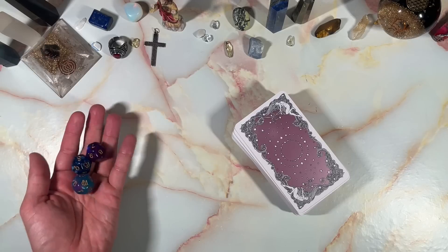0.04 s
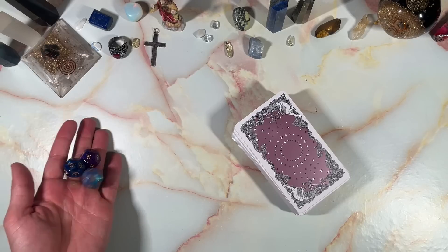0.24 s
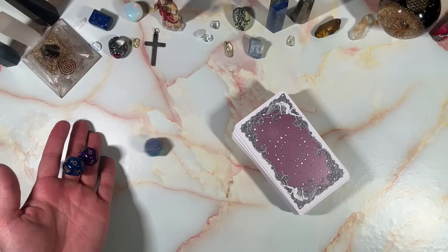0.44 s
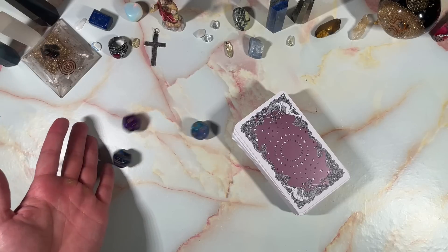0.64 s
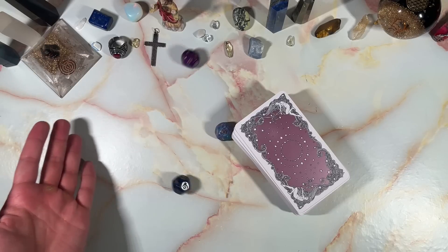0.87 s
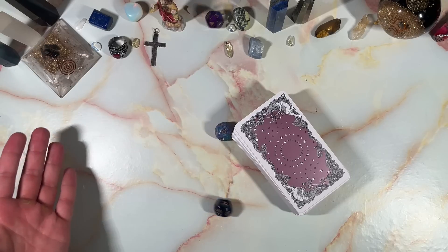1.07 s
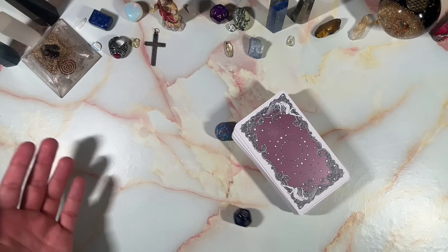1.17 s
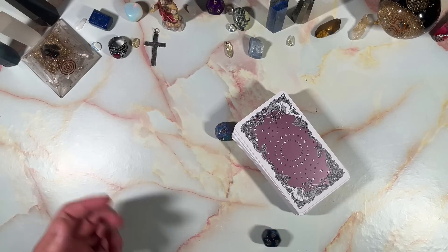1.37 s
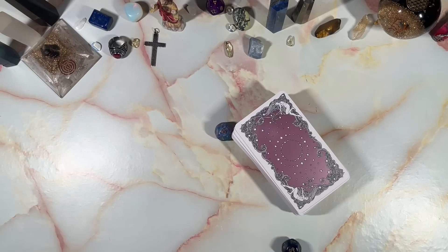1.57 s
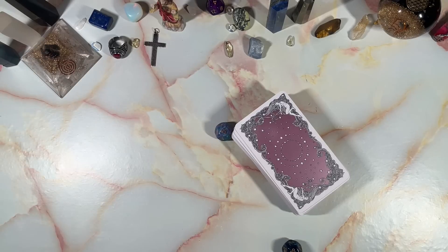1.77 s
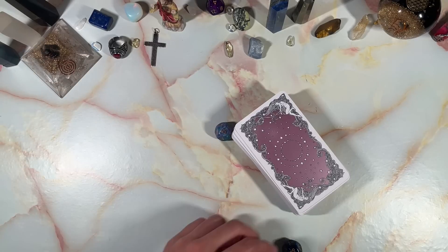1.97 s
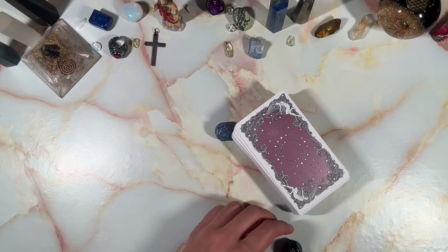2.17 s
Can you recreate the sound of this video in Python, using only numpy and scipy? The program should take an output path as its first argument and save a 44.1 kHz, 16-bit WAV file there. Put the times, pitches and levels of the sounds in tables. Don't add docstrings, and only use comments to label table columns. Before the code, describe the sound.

Dice clatter on a hard stone tabletop. Faint clicks and a slight skin rub come from the palm until 0.35 s, then a sharper click and first rolling knocks. Loud, resonant bounces crowd 0.55-0.95 s, strongest around 0.6-0.8. Softer knocks mix with a thin chain's bright tinkling until 1.15. Duller, sparse far taps fade by 1.7, leaving low room murmur. Close phone stereo, short faint reflections.

```python
import sys
import numpy as np
from scipy import signal
from scipy.fft import rfft, irfft
from scipy.io import wavfile
from scipy.ndimage import uniform_filter1d

SR = 44100
rng = np.random.default_rng(int(sys.argv[2]) if len(sys.argv) > 2 else 0)


def boost(x):
    u = np.asarray(x, float) / 20
    return 10 ** u


def to_wav(s):
    ch = np.atleast_2d(s).T
    pcm = np.round(np.clip(ch, -1, 1) * 32767)
    wavfile.write(sys.argv[1], SR, pcm.astype(np.int16))


N = 97902

# pitch_hz, level_db
FAR_COLOUR = [(200, 0), (500, 5), (1100, -6), (1500, -1.5), (2050, 7), (2800, -12.5), (3450, -1.5),
              (4400, -17)]
FAR_FROM_S = 1.2
GRAIN_DB = 1.5
KNOCK_DB = 1.5


def read(table, hz):
    a = np.array(table)
    return np.interp(np.log(hz), np.log(a[:, 0]), a[:, 1])


def curve(table):
    a = np.array(table)
    return boost(np.interp(np.arange(N) / SR, a[:, 0], a[:, 1], left=-140, right=-140))


def unit(x):
    return x / np.sqrt(np.mean(x ** 2))


def colour(x, table):
    f = np.maximum(np.fft.rfftfreq(N, 1 / SR), 1)
    inside = (f > table[0][0]) & (f < table[-1][0])
    return irfft(rfft(x) * boost(read(table, f)) * inside, N)


def low(x, hz):
    return signal.sosfilt(signal.butter(8, hz, fs=SR, output="sos"), x)


def band(x, low_hz, high_hz):
    return signal.sosfilt(signal.butter(2, [low_hz, high_hz], "band", fs=SR, output="sos"), x)


def grit(size, spread_db):
    bursts_db = spread_db * np.minimum(rng.exponential(size=size), 4.5)
    return unit(rng.standard_normal(size) * boost(bursts_db))


def decay(x, t60):
    return signal.lfilter([1], [1, -np.exp(-np.log(1000) / t60 / SR)], x)


def ring(x, hz, t60):
    return signal.lfilter([1], [1, -np.exp((2j * np.pi * hz - np.log(1000) / t60) / SR)], x)


def contact(s, chatter_ms, rise_s, knock_db):
    chatter_db = -4.5
    t = np.arange(4000) / SR
    swell = (1 - np.exp(-t / rise_s)) * np.exp(-1000 * t / max(chatter_ms, .3))
    force = boost(chatter_db) * grit(len(t), GRAIN_DB) * swell / np.sqrt(1 + chatter_ms) / 2
    force[int(rise_s * SR)] += boost(knock_db) / np.sqrt(1 + chatter_ms / 4)
    at = max(int(s * SR), 0)
    return slice(at, at + len(t)), force


def ports(hz, luck):
    # pitch_hz, level_db
    left_over_right = [(100, -2.5), (250, -0.5), (500, -9), (1000, -3), (2000, 1), (4000, -2.2)]
    # pitch_hz, phase_rad
    phase_spread = [(100, .2), (250, 0.28), (500, 1.3), (1000, 0.28), (2000, 1.4), (4000, .9)]
    lag_s = -0.000063
    half = np.pi * hz * lag_s + read(phase_spread, hz) * luck / 2
    left_db = read(left_over_right, hz)
    left = boost(left_db / 2) * np.exp(-1j * half)
    right = boost(-left_db / 2) * np.exp(1j * half)
    return np.array([[left], [right]])


def hiss(shape, tilt_db):
    # pitch_hz, level_db
    treble = [(5300, -33), (5800, -1), (8000, 1), (9600, -8.5), (10300, -16.5), (11500, -7), (13500, -15),
              (15800, -19.5)]
    mid, side = rng.standard_normal((2, N))
    noise = np.array([mid + .3 * side, np.roll(mid - .3 * side, 1)])
    tone = [(hz, db + tilt_db * np.log2(hz / 8000)) for hz, db in treble]
    return colour(noise * shape, tone) / np.std(colour(noise, tone))


def air():
    # pitch_hz, level_db (per Hz)
    murmur = [(40, -20.5), (90, -14.5), (150, -8.5), (450, -2.5), (800, -14), (2300, -26.5), (3000, -43),
              (6000, -43.5)]
    # pitch_hz, width_hz, level_db
    resonances = [(168, 16, 0), (474.6, 18, 2)]
    # start_s, level_db
    swell = [(0, 6.5), (1.1, 11), (1.5, 8.5), (1.75, 1.5), (2.3, 2.9)]
    level_db, hum_db = -67, -5.5
    likeness = 0.56
    mid, side = rng.standard_normal((2, N))
    mid, side = np.sqrt(1 + likeness) * mid, np.sqrt(1 - likeness) * side
    noise = np.array([mid + side, mid - side])
    hum = sum(boost(db) * unit(ring(noise, hz, 2.2 / width).imag) for hz, width, db in resonances)
    sway = boost(0.6 * unit(uniform_filter1d(rng.standard_normal(N), size=5000)))
    tone = unit(unit(colour(noise, murmur)) + boost(hum_db) * unit(hum))
    return tone * boost(level_db) * sway * curve(swell)


def reflections(near):
    t60_s, start_s, level_db = .22, 0.007, -19
    t = np.arange(SR // 2) / SR
    fade = np.exp(-np.log(1000) * t / t60_s) * np.clip(t / start_s - 1, 0, 1)
    tail = rng.standard_normal((2, len(t))) * fade
    tail = signal.sosfilt(signal.butter(1, 1809, fs=SR, output="sos"), tail)
    tail = tail / np.sqrt(np.sum(tail ** 2) / 2)
    return boost(level_db) * signal.fftconvolve(near.mean(0)[None], tail, axes=1)[:, :N]


def skin_slide():
    # start_s, level_db
    slide = [(.252, -50), (.268, -60.5), (.285, -52), (.31, -52.5), (.345, -62.5), (.368, -72.5)]
    skin = [(1500, -29), (2100, -10.5), (2900, -21), (4600, 1.0), (5600, -9), (6500, -12), (7500, -15),
            (9200, -37)]
    return unit(colour(grit(N, 3.5), skin)) * curve(slide) * np.ones((2, 1))


def pitched_clicks():
    # start_s, level_db, pitch_hz, chatter_ms, rise_ms; from 0.366 s these are the first knocks of a die
    clicks = [(.002, -45.5, 4200, 2, .9), (0.0098, -40, 3980, 7.4, 0.8), (0.146, -38, 4700, 7.2, .8),
              (0.155, -36.5, 4000, 9.5, 1.6), (0.179, -53, 3800, 4, 0.76), (0.2503, -35, 4840, 0.57, 0.56),
              (0.276, -31.5, 4550, 15, 3.7), (0.366, -23, 3900, 3.5, 5.5), (0.369, -12.5, 2500, 3, 5.5),
              (0.462, -22.5, 2300, 3.6, 2), (0.463, -31.5, 4060, 4.1, 2)]
    partials = [(.47, -10, 0.009), (.8, -3, 0.0036), (.9, 5.5, .007), (1, 8, 0.0083), (1.12, 4.5, 0.0051),
                (1.24, -1.5, 0.0036), (1.6, -9, 0.0047)]
    palm_db = 7
    out = np.zeros((2, N))
    for s, db, hz, chatter_ms, rise_ms in clicks:
        at, push = contact(s, chatter_ms, rise_ms / 1000, KNOCK_DB - 2 * rise_ms)
        force = np.zeros(N)
        force[at] = push * boost(db + palm_db - 8)
        for ratio, part_db, t60 in partials:
            f = hz * ratio
            tone = (ports(f, rng.standard_normal()) * ring(force, f, t60)).imag
            out += boost(part_db) * band(tone, f / 1.09, f * 1.3)
    return out


def chain():
    # start_s, level_db
    rattle = [(.958, -60), (.98, -51.5), (1.008, -51.5), (1.013, -64.5), (1.029, -68.5), (1.036, -56.5),
              (1.10, -47), (1.128, -73.5)]
    # start_s, level_db, length_ms
    link_ticks = [(0.965, -44.5, 2.8), (0.977, -37.5, 4), (1.001, -30, 3.8), (1.031, -25.5, 4.4),
                  (1.042, -44.5, 2.3), (1.059, -40.5, 2.6), (1.067, -33.5, 3), (1.074, -42, 4.6),
                  (1.086, -45, 5.3), (1.137, -43, 7.4)]
    rattle_db, tilt_db = 3.5, 11
    ticks = uniform_filter1d(np.abs(grit(N, 4.74)), size=40) * curve(rattle) * boost(rattle_db)
    for s, db, ms in link_ticks:
        age = np.maximum(np.arange(N) / SR - s, 0) * 1000 / ms
        ticks = ticks + boost(db + 11.0) * age * np.exp(-2 * age)
    body = band(rng.standard_normal(N) * ticks, 2600, 5500)
    return hiss(ticks, tilt_db) + boost(5.0) * body


def slab_modes():
    # pitch_hz, level_db (over the dense modes),
    # t60_s
    standout = [(160, 2, 0.063), (241.7, 11, 0.13), (296.1, 7.5, 0.13), (312, 10.5, 0.13), (409, 1, .1),
                (457, 6, 0.14), (554.6, 7.5, 0.1), (711.4, 6, 0.078), (885.7, 6.5, 0.088), (958.6, -3, .08),
                (1175, -0.5, 0.042), (1276.6, 3.5, 0.027), (1372, -4.5, 0.02), (3400, 3, 0.064)]
    # pitch_hz, level_db
    top = [(90, -31.5), (290, -13), (600, -13), (1250, -2.5), (2100, 0), (3400, -6), (4600, -10),
           (5500, -13.5)]
    # pitch_hz, t60_s
    ring_t60 = [(100, 0.083), (400, 0.1), (1000, 0.032), (2800, 0.039), (5500, 0.03)]
    count = 72
    place = np.arange(count) + .5 + .3 * rng.standard_normal(count)
    dense_hz = 80 + 5500 * (place / count) ** 1.6
    low_hz, low_db, low_t60 = np.array(standout).T
    hz = np.r_[dense_hz, low_hz]
    t60 = np.r_[read(ring_t60, dense_hz), low_t60]
    lift_db = np.r_[0 * dense_hz, low_db]
    gain = boost(read(top, hz) + lift_db - 20.0) * (hz / 1500) ** 0.26
    return hz, t60, gain, rng.standard_normal(len(hz))


def knocks(hz):
    # start_s, level_db, tilt_db (per octave), treble_db,
    # chatter_ms
    bounces = [(.146, -59, -10.5, -60, 6.7), (.379, -23.5, 5, -37, 8), (.3885, -18, 1.5, -38, 15),
               (.404, -21, -0.5, -41.5, 8), (.420, -19.5, -3, -41, 2), (.4685, -13.5, 1, -37.5, 9),
               (.4745, -17.5, -1.5, -41, 12), (.487, -17.5, 1.5, -43, 8), (.495, -15.5, 3, -40, 5),
               (.511, -23, -5, -41, 6), (.538, -13, 1.8, -37.5, 8), (.546, -13, 0, -40.5, 8),
               (.555, -15.5, 2.5, -39, 10), (.586, -0.5, 2.06, -33.5, 2.26), (.598, -9.5, 5.5, -34.5, 5),
               (.607, -12, 4.5, -36, 5), (.613, -10.5, -2.5, -28.5, 6), (.620, -17.5, 3.5, -26.5, 4),
               (.638, -8.5, -0.5, -38.5, 2.7), (.652, -5.5, -0.7, -27.5, 5.8), (.6635, -4.5, 4.5, -34, 1.8),
               (.6665, -6.5, 7.5, -34, 2.5), (.675, -11, -4, -34.5, 4), (.714, -7, 6.5, -31, 3.1),
               (.7217, -1.2, 0.3, -38, 2.4), (.7247, -2.65, -0.7, -40, 2.1), (.733, -17.5, -1.5, -38.5, 5),
               (.7735, 0.5, 0.5, -28.5, 2.34), (.7802, -2.5, 0, -32, 8.6), (.811, -11, 6.5, -39.5, 1.7),
               (.819, -9.5, 0.5, -23.5, 1.1), (.8275, -3, -2, -22.5, 1.5), (.836, -12.5, -3, -40, 3),
               (.851, -9.5, 1, -40.5, 2), (.857, -17, -6, -45, 2), (.881, -9.5, 4.5, -29.5, 2.8),
               (.894, -8.5, -2.7, -36.5, 4.1), (.9275, -10.5, 0.1, -39.5, 3)]
    # start_s, level_db, tilt_db (per octave), treble_db, chatter_ms
    settling = [(.962, -19, -1, -41, 26), (.991, -13, -0.2, -25, 1.6), (1.014, -13, -1.5, -26, 1.2),
                (1.037, -18.5, -1.3, -23, 6.2), (1.055, -20, 1.3, -32, 0.83), (1.065, -23, -2.3, -15, 2.4),
                (1.074, -21, 3, -29, 9.3), (1.139, -32.5, 5, -24, 15), (1.154, -22.5, 1.2, -40, 3.8),
                (1.272, -34, -7.5, -50, 5.8), (1.298, -17, 2.8, -48, 7.4), (1.355, -19.5, 5.7, -40, 2.1),
                (1.386, -30.5, 2, -50, 2.6), (1.392, -35.5, -4.5, -50, 5.6), (1.415, -38, -3, -55, 5),
                (1.430, -43, -2, -55, 4.7), (1.4405, -39, 0.3, -57, 3.8), (1.459, -39.5, -6.5, -56, 4.2),
                (1.491, -48, -6, -55, 3.2), (1.588, -45, -7.5, -51, 10.4), (1.596, -49.5, 0, -56, 3.5),
                (1.642, -49, -4, -55.5, 9.5), (1.665, -35, 2.3, -55, 4.05), (1.682, -48, -5, -57, 4)]
    table_db, treble_gain_db, scatter_db = 3.5, 2, 2.5
    bell_hz, bell_db = 1866, 0.42
    in_step = .65
    count = len(hz)
    force, crack = np.zeros((count, N)), np.zeros(N)
    octave = np.log2(hz / bell_hz)
    for s, db, tilt_db, treble_db, chatter_ms in list(bounces) + list(settling):
        if s > FAR_FROM_S:
            at, push = contact(s, chatter_ms, 0.0034, -6)
            tone_db = tilt_db * np.maximum(octave, -1) + read(FAR_COLOUR, hz)
        else:
            at, push = contact(s, chatter_ms, 0.00091, KNOCK_DB)
            tone_db = tilt_db * octave
        scatter = scatter_db * np.clip(rng.standard_normal(count), -2, 1.5)
        mix = boost(db + table_db + tone_db - bell_db * octave ** 2 + scatter)
        sign = np.where(rng.random((count, 1)) < in_step, 1, -1)
        force[:, at] += mix[:, None] * sign * push
        crack[at] += boost(db + treble_db + treble_gain_db) * np.abs(push)
    return force, crack


def tabletop():
    # start_s, level_db
    roll_levels = [(.375, -48), (.40, -22.5), (.455, -31.5), (.578, -28.5), (.63, -20.5), (.70, -19),
                   (.76, -26), (.84, -25.5), (.92, -31.5), (1.0, -27), (1.08, -47), (1.13, -57.5),
                   (1.26, -75), (1.39, -56), (1.495, -61), (1.52, -76.5), (1.65, -66), (1.71, -91)]
    roll_db, roll_tilt_db, far_tilt_db = 4.5, 2, -21
    roll_treble_db, treble_t60_s = -31.5, 0.0088
    travel_ms = .9
    hz, t60, gain, luck = slab_modes()
    force, crack = knocks(hz)
    roll = curve(roll_levels)
    tumble = [grit(N, GRAIN_DB) * roll for _ in range(6)]
    distant = np.arange(N) / SR > FAR_FROM_S
    out = 0
    for k, f in enumerate(hz):
        far_db = read(FAR_COLOUR, f) + far_tilt_db * max(np.log2(f / 2000), 0)
        roll_gain = boost(roll_db - 20 + roll_tilt_db * np.log2(f / 1500)) * np.where(distant, boost(far_db), 1)
        push = force[k] + roll_gain * tumble[k % 6]
        late = int(travel_ms * SR / 1000 * (np.sqrt(1000 / f) - .5))
        out = out + gain[k] * (ports(f, luck[k]) * ring(np.roll(push, late), f, t60[k])).imag
    body = np.where(distant, low(out, 4200), low(out, 5600))
    treble = decay(crack, treble_t60_s) / 4 + boost(roll_treble_db - 4.5) * roll
    return body + hiss(treble, 0.27)


def scene():
    near = tabletop() + chain() + pitched_clicks() + skin_slide()
    return near + reflections(near) + air()


def gate(x):
    edges_hz = [5900, 6600, 9600, 10600, 13600, 16500]
    half_shut = [-72, -90.5, -81, -82, -88]
    soft_db = 3.5
    f, _, z = signal.stft(x, SR, nperseg=512, noverlap=384)
    gain = np.ones(z.shape[1:])
    for a, b, shut_db in zip(edges_hz[:-1], edges_hz[1:], half_shut):
        rows = (f >= a) & (f < b)
        band_db = 10 * np.log10(np.mean(np.abs(z[:, rows]) ** 2, axis=(0, 1)) + 1e-18)
        gain[rows] = .5 + .5 * np.tanh((band_db - shut_db) / soft_db)
    return signal.istft(z * gain, SR, nperseg=512, noverlap=384)[1][:, :N]


def top_cut(x):
    return signal.sosfilt(signal.butter(12, 15800, fs=SR, output="sos"), x)


def record(dry):
    x = signal.sosfilt(signal.butter(3, 115.9, "high", fs=SR, output="sos"), dry)
    mix = np.clip(gate(x), -1, 1)
    return top_cut(mix)


dry = scene()
out = record(dry)
to_wav(out)
```